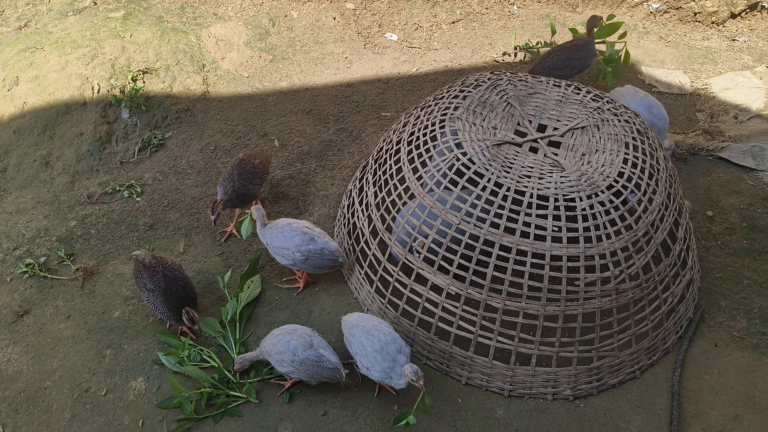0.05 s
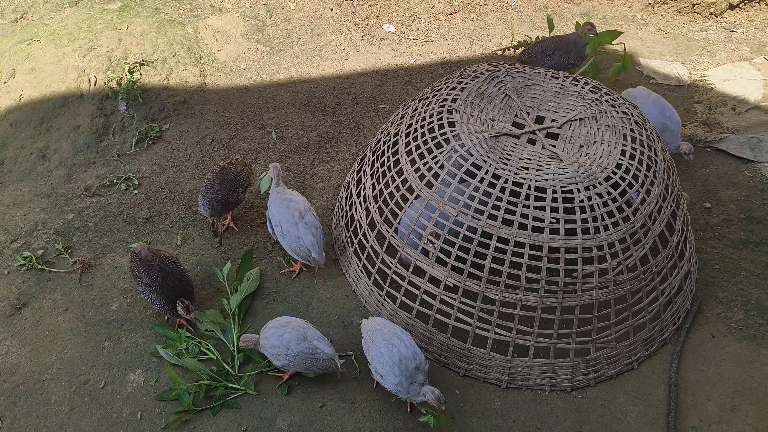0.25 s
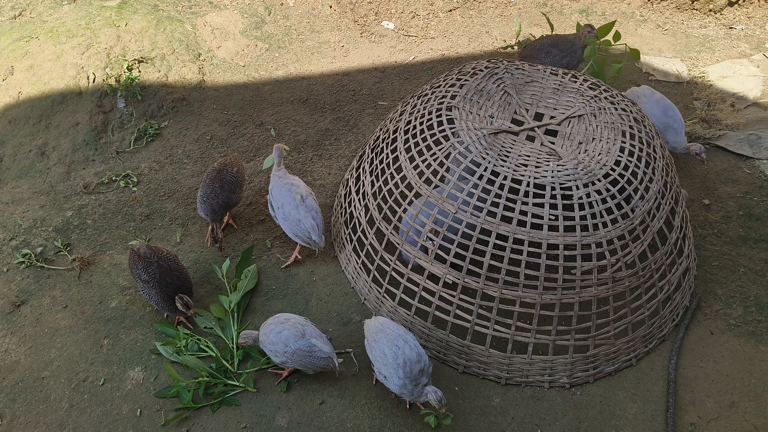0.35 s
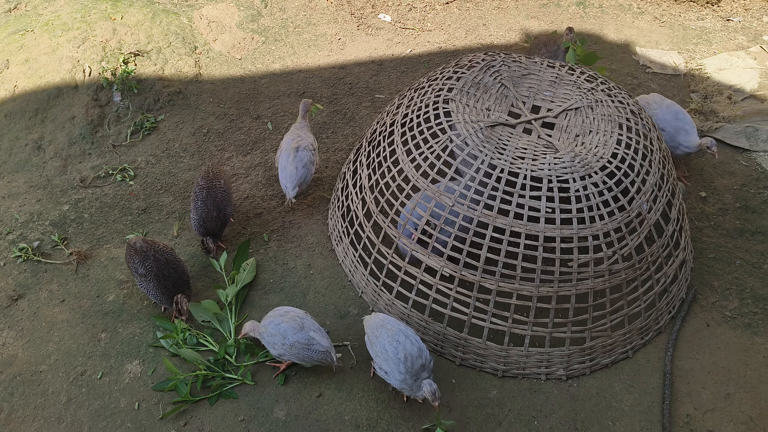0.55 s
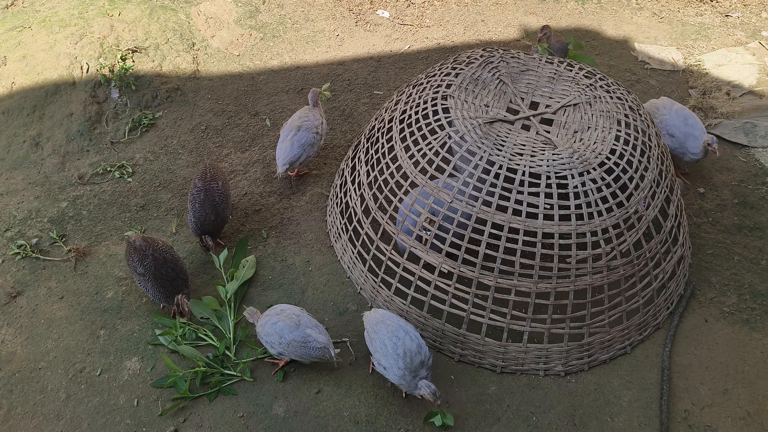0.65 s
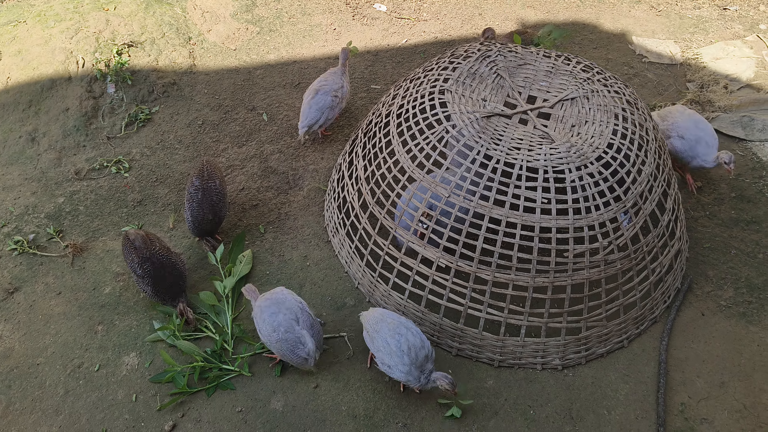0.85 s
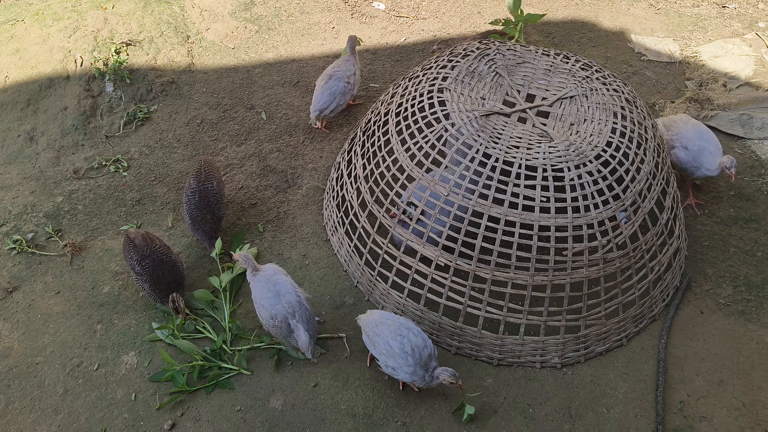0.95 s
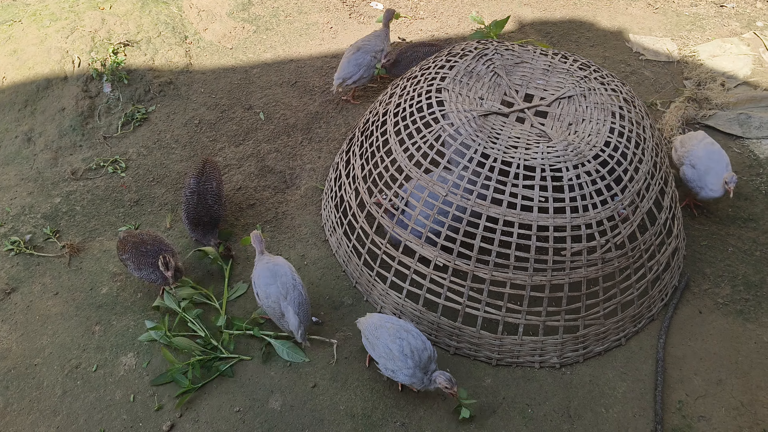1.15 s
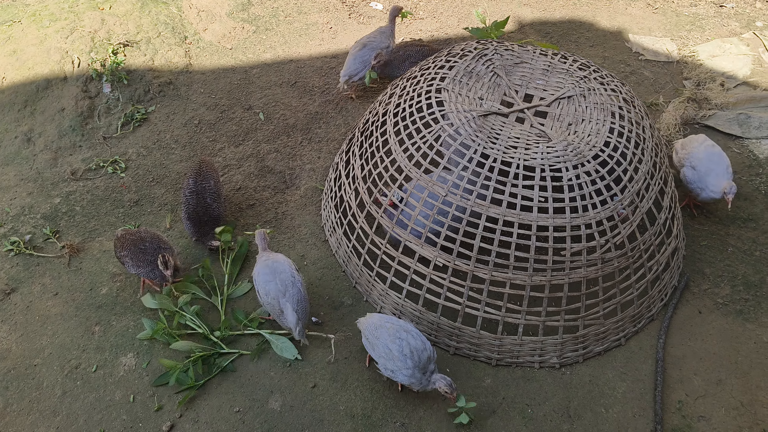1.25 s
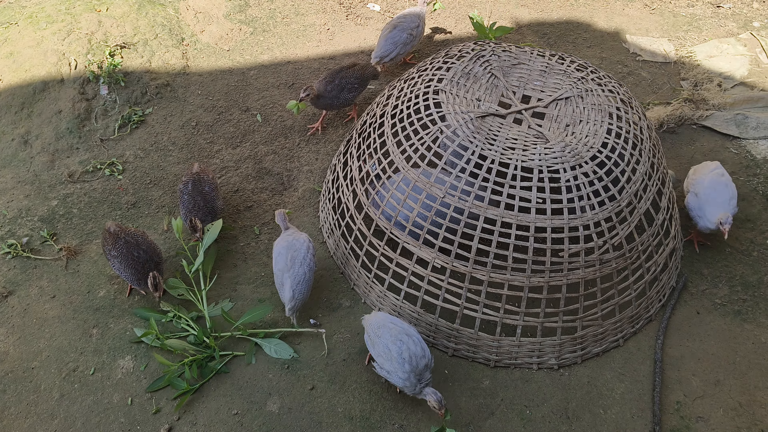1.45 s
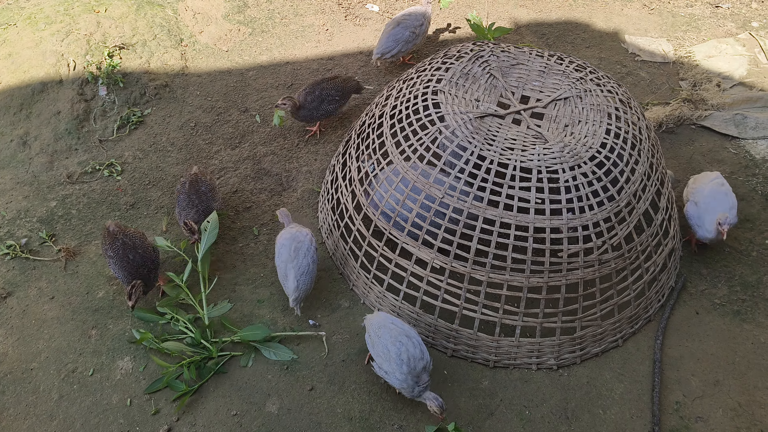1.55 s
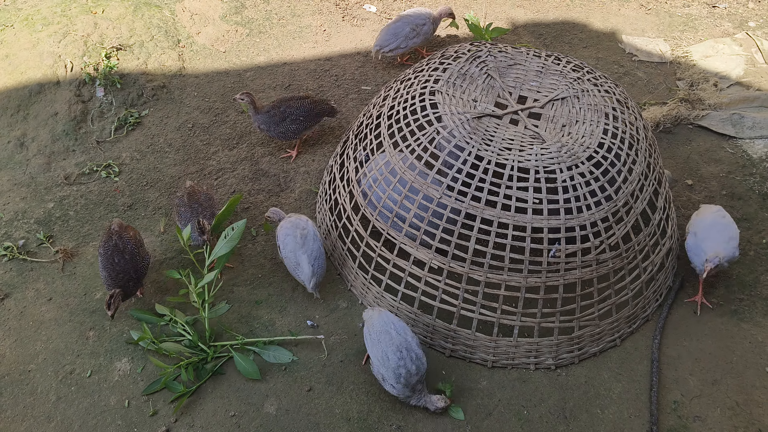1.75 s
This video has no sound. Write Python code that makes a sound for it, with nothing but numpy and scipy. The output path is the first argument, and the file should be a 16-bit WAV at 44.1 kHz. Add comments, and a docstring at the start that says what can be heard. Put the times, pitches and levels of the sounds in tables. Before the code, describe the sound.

A young guinea fowl gives a shrill, fast-trilled whistle from about 0.2 s, with three harsh rasps near 0.4, 0.5 and 0.6 s, sagging to a falling note by 0.8 s. Pecks and leaf rustles tick at 0.75 and 1.2-1.4 s. A quiet moan slides down near 1.15 s, a faint cluck follows at 1.5, and a short peep at 1.65. Soft outdoor rumble, hiss and early wind.

```python
"""A bare yard outdoors, where young guinea fowl forage over a low rumble, a hiss and a dying puff of wind.
One bird gives a trilled whistle, a swept and pulsed tone, that sags into a falling note, still beating in
loudness while its pitch swing shrinks. Three harsh rasps, rough pulses ringing a throat, cross its middle;
a faint low one comes later. Soft clucks, a peep and a quiet moan are gliding tones; pecks and leaf rustles
are short bursts of noise. Ground and walls scatter the sound into two spaced microphones."""
import sys
import numpy as np
from scipy import signal
from scipy.fft import rfft, irfft
from scipy.io import wavfile
from scipy.ndimage import uniform_filter1d

SR = 44100
rng = np.random.default_rng(int(sys.argv[2]) if len(sys.argv) > 2 else 0)


def to_wav(sig):
    """Store sig (one row per channel, or 1-D mono) as 16-bit WAV at the path in sys.argv[1].

    Samples outside -1..1 are clipped; the rate is SR.
    """
    pcm = np.clip(np.atleast_2d(sig), -1, 1) * 32767
    pcm = np.round(pcm).astype(np.int16)
    wavfile.write(sys.argv[1], SR, pcm.T)  # frames by channels


N = 79380


def undb(db):
    """Turn decibels into gain."""
    return 10 ** (np.asarray(db) / 20)


def unit(x):
    """Scale to an average (rms) level of 1."""
    return x / np.sqrt(np.mean(x ** 2))


def clock():
    """Time of every sample, in seconds."""
    return np.arange(N) / SR


def colour(x, points):
    """Change the tone by a curve of (pitch_hz, level_db) points, joined evenly over log pitch."""
    hz, db = np.array(points).T
    f = np.fft.rfftfreq(2 * N, 1 / SR)
    gain = undb(np.interp(np.log(f + 1), np.log(hz), db))
    return irfft(rfft(x, 2 * N) * gain)[..., :N]


def ring(x, hz, width):
    """A steep resonance: the same band-pass twice in a row."""
    b, a = signal.iirpeak(min(hz, SR * .45), hz / width, fs=SR)
    return signal.lfilter(b, a, signal.lfilter(b, a, x))


def walk(rate):
    """Smooth random wander with spread 1; a higher rate wanders faster."""
    k = max(int(SR / rate), 1)
    return unit(uniform_filter1d(uniform_filter1d(rng.standard_normal(N), k), k))


def swell(middle, rise, fall, shape=2):
    """A rounded rise and fall; rise and fall are the times to about a third of the peak."""
    t = clock() - middle
    return np.exp(-np.abs(t / np.where(t < 0, rise, fall)) ** shape)


# tone of the background: pitch_hz, relative level_db per Hz
FLOOR = [(15, -19), (25, -10), (59, -2), (161, 0.5), (373, -8), (591, -11), (818, -16.5), (962, -13),
         (1370, -18.5), (2480, -17), (3250, -21.5), (3820, -21.5), (4490, -20), (5000, -19.5), (7310, -22),
         (9070, -28.5), (10100, -21.5), (11600, -35), (16000, -29.5)]
# background level over time, dipping and recovering: time_s, bass_db, treble_db
FLOOR_LEVEL = [(0, 3, -4.5), (.22, 1.5, 3.5), (.42, -1.5, 4.5), (.62, -4, 2), (.85, -2, -7),
               (1.051, 0, -1.5), (1.3, 1, 2), (1.62, 2, 3.5), (1.8, 2.5, 2.5)]
# tone of the wind: pitch_hz, relative level_db
WIND_COLOUR = [(15, -28), (33, -20), (50, -7), (72, -14), (200, -45.5)]
FLOOR_DB, BASS_EDGE_HZ = -56, 2100  # level before the slow changes; split between bass and treble
FLOOR_SIDE_HZ, BASS_SIDE = 480, 0.22  # stereo difference is mostly above this pitch; share added at all pitches
WIND_DB, WIND_FADE_S = -59, 0.37


def outdoors():
    """Distant rumble and hiss whose levels dip and recover at set times, and a puff of wind that dies away."""
    mid, side = rng.standard_normal((2, N))
    high_pass = signal.butter(1, FLOOR_SIDE_HZ, "high", fs=SR, output="sos")
    side = BASS_SIDE * rng.standard_normal(N) + signal.sosfilt(high_pass, side)
    air = unit(colour(np.array([mid + side, mid - side]), FLOOR)) * undb(FLOOR_DB)

    low_pass = signal.butter(2, BASS_EDGE_HZ, fs=SR, output="sos")
    bass = signal.sosfiltfilt(low_pass, air)
    treble = air - bass
    times, bass_db, treble_db = np.array(FLOOR_LEVEL).T
    bass_gain = undb(np.interp(clock(), times, bass_db))
    treble_gain = undb(np.interp(clock(), times, treble_db))

    wind = unit(colour(rng.standard_normal(N), WIND_COLOUR)) * undb(WIND_DB)
    wind = wind * swell(0, WIND_FADE_S, WIND_FADE_S, 2.5)
    return bass * bass_gain + treble * treble_gain + wind


# time to fade by 60 dB, and level against the direct sound
EARLY_T60_S, EARLY_DB, LATE_T60_S, LATE_DB = 0.069, 3, 0.35, -8
MIC_LAG_S = .00019  # direct sound comes this much later on the left


def yard(x):
    """Direct sound reaches two microphones a moment apart; ground scatters it, walls add a short tail."""
    t = clock()[:N // 3]
    ground, walls = rng.standard_normal((2, 2, len(t)))
    response = 0
    for noise, t60, db, start in ((ground, EARLY_T60_S, EARLY_DB, .0005), (walls, LATE_T60_S, LATE_DB, .009)):
        tail = noise * undb(-60 * t / t60) * (t > start)
        response = response + undb(db) * tail / np.linalg.norm(tail, axis=1, keepdims=True)
    direct = np.sinc(SR * (t - np.array([[MIC_LAG_S], [0]])))
    response = response + direct
    response = response / np.linalg.norm(response, axis=1, keepdims=True)
    return signal.fftconvolve(x[None], response, axes=1)[:, :N]


# pecks and scuffs: start_s, decay_s, level_db before the left-right pan
PECKS = [(0.17, 0.0011, -59), (0.731, 0.0036, -42.5), (.747, 0.005, -47), (1.202, 0.0057, -45.5),
         (1.258, 0.0034, -43), (1.303, 0.009, -48), (1.371, 0.0048, -46), (1.583, .001, -48.5),
         (1.723, 0.0007, -47), (1.769, 0.0023, -46.5)]
# tone of the pecks: pitch_hz, relative level_db
PECK_COLOUR = [(300, -12), (600, -1), (1500, -9.5), (3500, -6.5), (5000, -3.5), (7500, 0), (10500, -22),
               (14000, 2.5), (16000, -15)]
# leaves tugged and brushed: middle_s, half_length_s, level_db before yard and pan, centre_hz
RUSTLES = [(.17, 0.037, -58.5, 6480), (0.737, 0.018, -48.5, 9500), (0.876, 0.063, -62, 6200),
           (1.246, 0.05, -59, 6300), (1.323, 0.016, -58, 8000), (1.355, 0.018, -53.5, 5900),
           (1.381, 0.0059, -49, 7600), (1.444, .015, -80, 14000), (1.669, 0.009, -57.5, 7700),
           (1.797, .025, -52.5, 5850)]
LEAF_GRAINS_PER_S, LEAF_SCATTER_DB = 2000, 2.5
LEAF_WIDTH = 0.86  # width of each band-pass as a share of its centre pitch
PECK_ECHO_DB = -4  # pecks sent into the yard


def foraging():
    """Beaks and feet tick on dry earth close by; leaves crackle in dense grains."""
    t = clock()
    blows = sum(undb(db) * (t >= at) * np.exp(-np.abs(t - at) / decay) for at, decay, db in PECKS)
    ticks = blows * unit(colour(rng.standard_normal((2, N)), PECK_COLOUR))

    grains = (rng.random(N) < LEAF_GRAINS_PER_S / SR) * rng.standard_normal(N)
    grains = grains * undb(LEAF_SCATTER_DB * rng.standard_normal(N))
    leaves = 0
    for at, half, db, hz in RUSTLES:
        crackle = unit(ring(grains, hz, min(hz * LEAF_WIDTH, SR / 4)))
        leaves = leaves + undb(db) * swell(at, half, half) * crackle
    return ticks + yard(leaves + undb(PECK_ECHO_DB) * ticks[0])


# soft falling moan: time_s, pitch_hz, level_db before flutter and yard
MOAN = [(1.076, 765, -64), (1.102, 725.6, -62), (1.148, 661.5, -50), (1.179, 584, -53.5), (1.197, 560, -62)]
# strength of each harmonic, from the first up: relative level_db
MOAN_HARMONICS = [-6.5, -4, -17, -13, -19]
MOAN_FLUTTER, MOAN_ROUGH = .5, .005  # depth of the level flutter; pitch scatter as a share of pitch
FLUTTER_HZ = 65.5  # shared by the moan and the chirps


def moan():
    """Another bird's quiet, fluttering note slides down, strongest in its second harmonic."""
    t = clock()
    times, hz, db = np.array(MOAN).T
    pitch = np.interp(t, times, hz) * (1 + MOAN_ROUGH * walk(500))
    phase = 2 * np.pi * np.cumsum(pitch) / SR
    gain = undb(np.interp(t, times, db, left=-120, right=-120))
    tone = unit(sum(undb(level) * np.sin(k * phase) for k, level in enumerate(MOAN_HARMONICS, 1)))
    return gain * tone * (1 + MOAN_FLUTTER * np.sin(2 * np.pi * FLUTTER_HZ * t))


# short tones, first the tonal onsets of the second and third rasps, then small calls:
# start_s, length_s, start_hz, end_hz, level_db before flutter and yard,
# second_harmonic_db, fall_db per further harmonic, flutter (0-1)
CHIRPS = [(0.437, 0.022, 1468, 1379, -44.5, -21, -12, .1), (0.539, 0.046, 1450, 1476, -49, 1, -9, 0),
          (0.762, 0.0534, 2520, 2416, -42.5, -32, -10, 0.45),
          (1.483, 0.049, 1098, 1144, -57.5, -16, -13, 0.53),
          (1.5, 0.064, 1917, 1987, -58.5, -23, -3.5, 0.39),
          (1.635, 0.0089, 3050, 3570, -45.5, -25, -16, .1),
          (1.644, 0.0079, 3540, 3200, -39, -30, -10, 0.02),
          (1.655, 0.0088, 1566, 1514, -33.5, -19, -3.5, 0),
          (1.656, 0.017, 3500, 3564, -43, -14.5, -22, 0.3)]
CHIRP_ROUGH = .012  # pitch scatter as a share of pitch, when there is no flutter


def chirps():
    """Short gliding tones with a few harmonics, most fluttering: two rasp onsets, then small calls."""
    t, out = clock(), 0
    for at, length, start_hz, end_hz, db, second_db, fall_db, flutter in CHIRPS:
        progress = np.clip((t - at) / length, 0, 1)
        glide = start_hz + (end_hz - start_hz) * progress
        pitch = glide * (1 + CHIRP_ROUGH * (1 + 2 * flutter) * walk(513))
        phase = 2 * np.pi * np.cumsum(pitch) / SR
        harmonics = sum(undb(second_db + (k - 2) * fall_db) * np.sin(k * phase) for k in range(2, 6))
        tone = np.sin(phase) + harmonics
        pulsing = 1 + flutter * np.sin(2 * np.pi * FLUTTER_HZ * (t - at))
        out = out + undb(db) * np.sqrt(2) * np.sin(np.pi * progress) * tone * pulsing
    return out


# rasps: loudest_s, rise_s, fall_s, level_db before the yard, chest_db against the throat,
# treble_db (with EDGE_DB, against the throat)
RASPS = [(.387, .021, .022, -29.5, -6.5, -40), (0.497, 0.039, 0.025, -27, -10.5, -1.5),
         (.597, 0.038, 0.028, -30.5, -9, -2.5), (1.52, 0.043, 0.047, -65, 9, 0)]
# high throat resonances: pitch_hz, width_hz before broadening, relative level_db
THROAT = [(2890, 530, 5.5), (3530, 290, 1.5), (4220, 1260, 1.5), (5640, 1200, -21)]
# low chest resonances: pitch_hz, width_hz before broadening, relative level_db
CHEST = [(754, 59, -6.5), (1184, 170, -0.5), (1545, 170, 0.5), (1977, 127, 5)]
# tone of the harsh edge: pitch_hz, relative level_db
EDGE = [(2000, -19), (4500, 11.5), (6500, 4), (8000, -3), (9500, -0.5), (11500, -6), (13500, -4),
        (16000, -23)]
EDGE_DB = -9
RASP_PULSE_HZ, RASP_JITTER, RASP_SCATTER_DB = 720.2, .2, 3  # mean rate; scatter of rate (share) and level
RASP_AIR, RASP_FLUTTER_HZ, RASP_FLUTTER_DB = 0.34, 220, 2.5  # breath noise; random level wander
CHEST_LEAD_S, CHEST_STRETCH, RASP_SHAPE = 0.0091, 0.93, 1.65


def resonate(drive, table):
    """Ring a set of resonances side by side, each broadened 1.35 times."""
    return unit(sum(undb(db) * ring(drive, hz, 1.35 * width) for hz, width, db in table))


def rasps():
    """Chaotic pulses and air ring the throat; the low resonances open a little ahead of the high ones."""
    cycles = np.cumsum(RASP_PULSE_HZ * (1 + RASP_JITTER * walk(900))) / SR
    # one click each time a cycle completes
    pulses = np.diff(np.floor(cycles), prepend=0) * undb(RASP_SCATTER_DB * walk(700))
    drive = unit(pulses) + RASP_AIR * rng.standard_normal(N)
    drive = drive * undb(RASP_FLUTTER_DB * walk(RASP_FLUTTER_HZ))

    throat = resonate(drive, THROAT)
    chest = resonate(drive, CHEST)
    edge = unit(colour(drive, EDGE))
    out = 0
    for at, rise, fall, db, chest_db, treble_db in RASPS:
        high_swell = swell(at, rise, fall, RASP_SHAPE)
        low_swell = swell(at - CHEST_LEAD_S, rise * CHEST_STRETCH, fall * CHEST_STRETCH, RASP_SHAPE)
        high = high_swell * (throat + undb(EDGE_DB + treble_db) * edge)
        low = low_swell * chest
        out = out + undb(db) * (high + undb(chest_db) * low)
    return out


# trilled whistle: time_s, pitch_hz, level_db before beak and yard, trill_swing_hz, trill_dip (0-1)
WHISTLE = [(.198, 3195, -60, 432, 0.7), (.22, 3300, -38.5, 477, 0.57), (0.244, 3610, -41.5, 560, 0.93),
           (.29, 3441, -43.5, 498, 0.06), (.345, 3120, -44.5, 430, 0.39), (.415, 3800, -40, 496, .35),
           (0.449, 3498, -38.5, 563, 0.6), (0.533, 3200, -35.5, 380, .45), (.575, 3510, -46.5, 628, 0),
           (0.634, 3799, -41.5, 464, 0.75), (.66, 3385, -39, 378, 0), (.688, 2847, -35.5, 139, 1),
           (.715, 2496, -39.5, 55.7, 0.6), (0.751, 2295, -45, 33, 0.44), (0.774, 2143, -42, 24.8, 0.34),
           (.803, 2133, -67, 25.5, 0), (.817, 2140, -81, 25, .15)]
# overtones of the whistle, from the second harmonic up: level_db against the first
OVERTONES = [-8, -10.5]
# the beak colours the whistle: pitch_hz, level_db
BEAK = [(2000, 0), (3000, -3.5), (3800, 1.5), (4900, 5), (5400, -10), (5950, 0), (6400, -8.5), (7000, 1.5),
        (7700, -12.5), (9000, -18), (10500, -18.5)]
TRILL_PER_CYCLE, TRILL_JITTER = .0335, 0.046  # trill beats per whistle cycle; random share of that rate
TRILL_CREST_S, TRILL_SHARPNESS = .686, 2  # a beat peaks at this time; higher power makes narrower beats
WHISTLE_ROUGH, WHISTLE_FLICKER_DB = .3, 1.8  # pitch scatter as a share of the swing; level scatter


def whistle():
    """A trill sweeps and pulses a whistle; as the pitch sinks it slows and swings less, still beating."""
    t = clock()
    times, pitch_hz, level_db, swing_hz, dips = np.array(WHISTLE).T
    hz = np.interp(t, times, pitch_hz)
    swing = np.interp(t, times, swing_hz)
    dip = np.clip(np.interp(t, times, dips), 0, 1)
    gain = undb(np.interp(t, times, level_db, left=-120, right=-120))

    trill_hz = TRILL_PER_CYCLE * hz * (1 + TRILL_JITTER * walk(72))
    trill = 2 * np.pi * np.cumsum(trill_hz) / SR
    trill = trill - np.interp(TRILL_CREST_S, t, trill)
    # the pitch sweep is offset a little from the loudness beats
    sweep = swing * (WHISTLE_ROUGH * walk(1284) - np.sin(trill + 0.41))
    phase = 2 * np.pi * np.cumsum(hz + sweep) / SR

    tone = np.sin(phase) + sum(undb(db) * np.sin(k * phase) for k, db in enumerate(OVERTONES, 2))
    beats = (1 + dip * np.cos(trill)) ** TRILL_SHARPNESS / (1 + dip ** 2)
    flicker = undb(WHISTLE_FLICKER_DB * walk(180))
    return colour(gain * tone * beats * flicker * np.sqrt(2), BEAK)


FORAGING_PAN_DB = -3.5  # left minus right, so foraging leans right


def scene():
    """Mix the calls through the yard, the foraging to the right, and the outdoor background."""
    pan = undb(np.array([[FORAGING_PAN_DB], [-FORAGING_PAN_DB]]) / 2)
    calls = whistle() + rasps() + chirps() + moan()
    return undb(3) * yard(calls) + pan * foraging() + outdoors()


# tone of the left side against the right: pitch_hz, left_minus_right_db
BALANCE = [(200, -0.5), (700, -4.5), (1300, 0), (2800, -4.5), (4500, 2.5), (6500, -2.5), (8500, -6.5),
           (14000, -2)]
TOP_HZ = 16000


def record(dry):
    """Split the left-right balance evenly between the two microphones and cut the top."""
    sides = []
    for x, sign in zip(dry, (1, -1)):
        sides.append(colour(x, [(hz, sign * db / 2) for hz, db in BALANCE]))
    low_pass = signal.ellip(8, .2, 70, TOP_HZ, fs=SR, output="sos")
    return signal.sosfilt(low_pass, np.array(sides))


dry = scene()
out = record(dry)
to_wav(out)
```